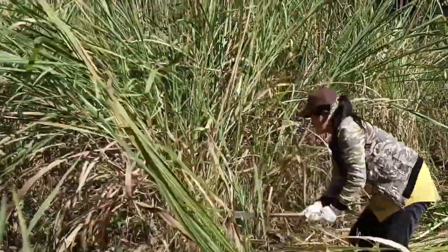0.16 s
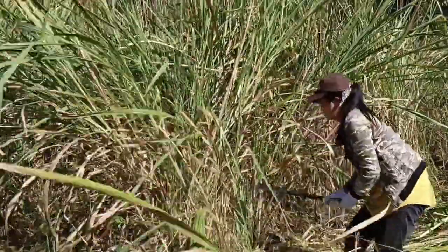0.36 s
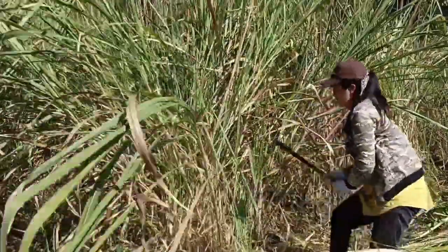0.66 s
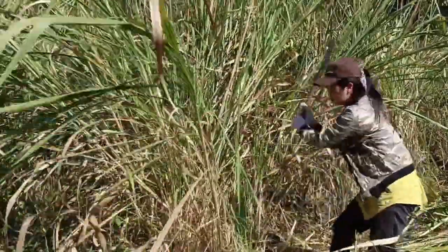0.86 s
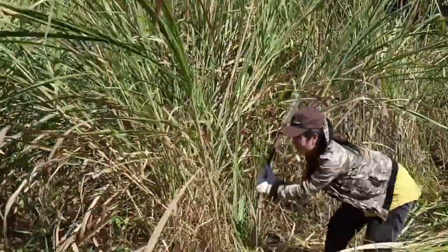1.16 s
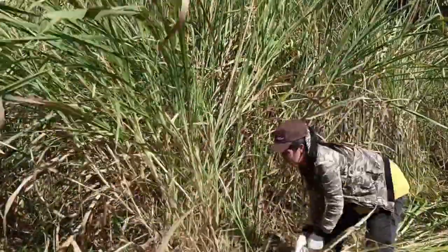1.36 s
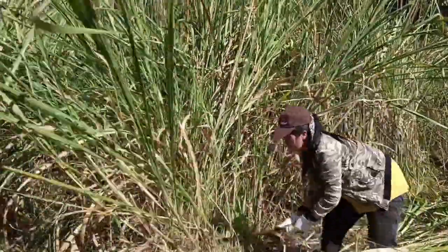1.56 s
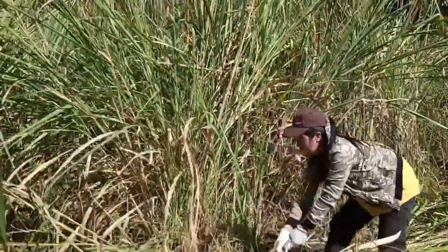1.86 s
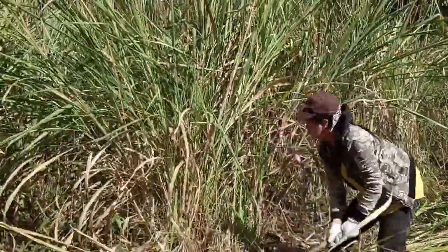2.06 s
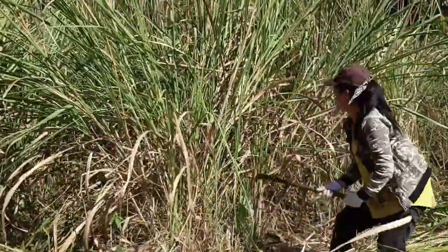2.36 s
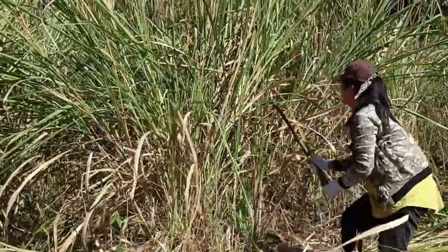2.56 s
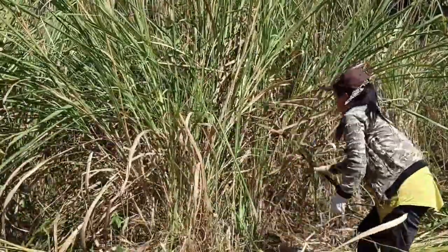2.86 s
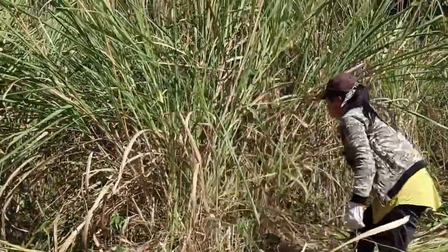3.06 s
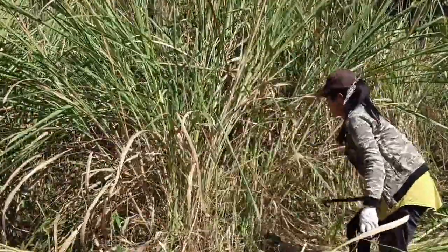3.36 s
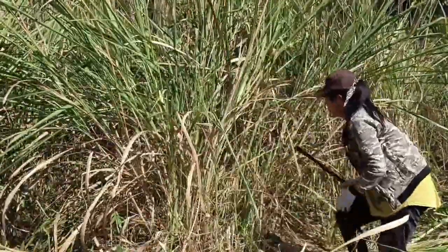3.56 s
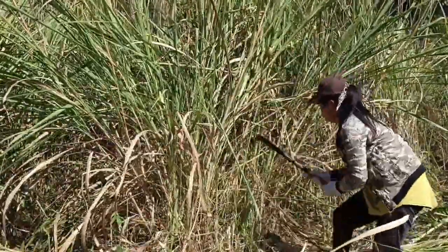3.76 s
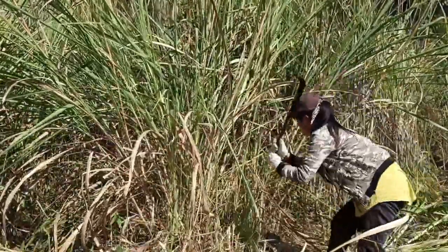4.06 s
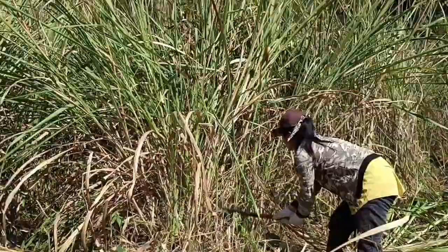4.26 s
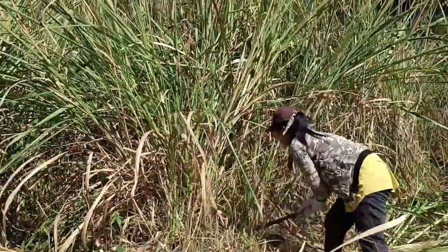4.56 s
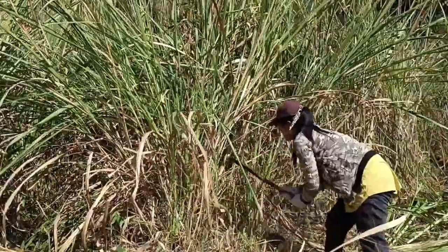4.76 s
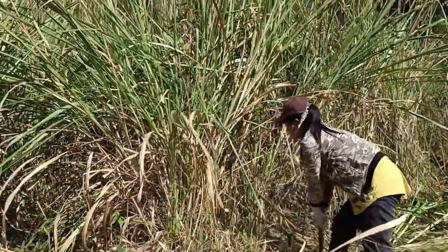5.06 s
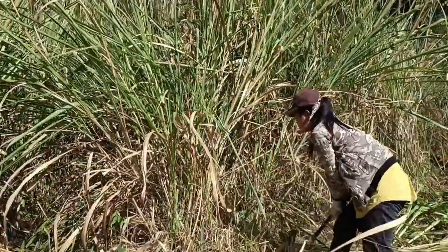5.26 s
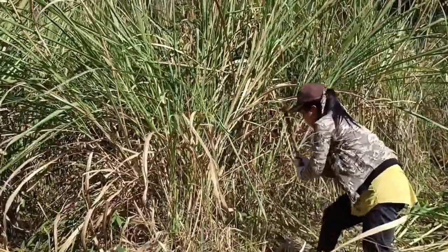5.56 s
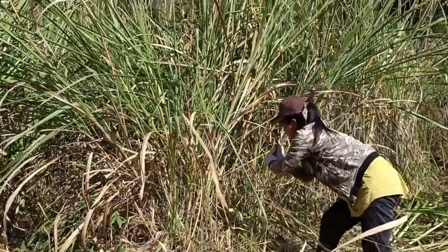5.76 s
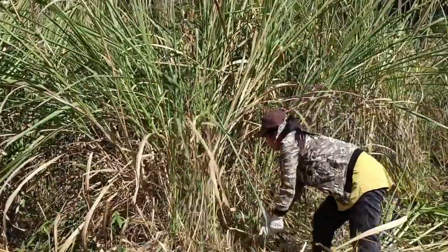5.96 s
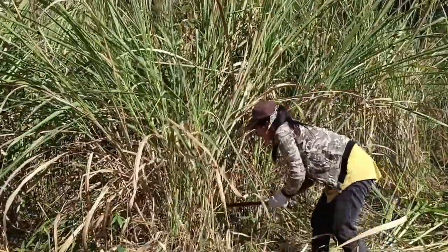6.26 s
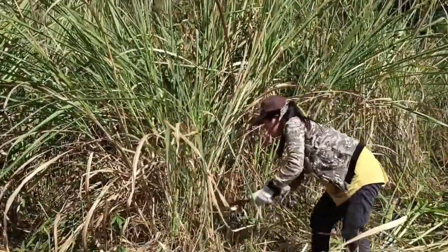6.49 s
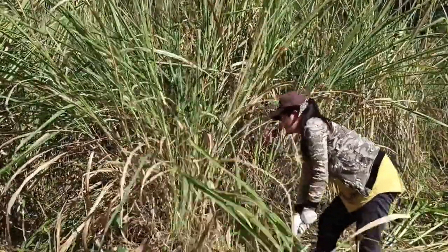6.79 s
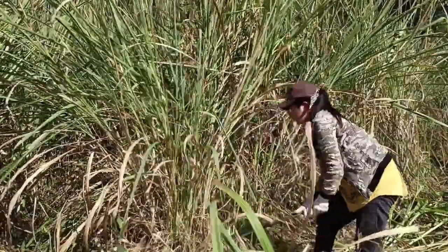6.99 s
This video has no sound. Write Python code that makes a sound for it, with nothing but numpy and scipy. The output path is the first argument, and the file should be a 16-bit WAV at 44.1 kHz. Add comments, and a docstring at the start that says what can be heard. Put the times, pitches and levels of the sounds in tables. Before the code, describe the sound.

Dry grass is already rustling loudly at the start, with two stem snaps near 0.1 s. A hard double chop with a low root thud lands around 0.55 s, then light leaf swishes and knocks until 1.0 s. Wind thumps on the left before another solid cut at 1.56 s. From 2.1 s the clump is tugged with thick crackling, easing toward 2.7 s, where a light cut and snap follow. A quick cluster of crunches comes at 3.1-3.25 s, then quieter settling with low wind on the left. A knock near 4.4 s leads to a heavy crunch at 4.57 s. Another chop and drag come at 5.3 s, and a dull knock at 5.57 s. The sharpest blow lands at 6.24 s with a deep thump, and cuts at 6.83 and 7.03 s finish amid strong rustling. Faint open air lies beneath.

```python
"""Cutting tall dry grass

A machete works through a stand of tall dry grass, a few metres from two microphone ports.
The blade crunches through bundles of stalks and thuds at their roots: bursts of tiny clicks over low noise.
Single stems snap (short noise cracks) or knock (fading tones), and dragged leaves crackle (filtered clicks).
Puffs of wind rumble unevenly in the two ports (filtered noise) with low thumps (brief sinking tones),
over faint steady air, also filtered noise."""
import sys
import numpy as np
from scipy import signal
from scipy.fft import rfft, irfft, next_fast_len
from scipy.io import wavfile

SR = 44100
rng = np.random.default_rng(int(sys.argv[2]) if len(sys.argv) > 2 else 0)


def persist_wave(psi):
    """Save psi, clipped to +-1, as 16-bit WAV."""
    counts = np.round(np.clip(psi, -1, 1) * 32767).astype(np.int16)
    wavfile.write(sys.argv[1], SR, np.atleast_2d(counts).T)


N = 314433  # samples, about 7.1 s
TIME = np.arange(N) / SR
SIZE = next_fast_len(N + 8192)  # spare room keeps filter tails from wrapping round
HZ = np.fft.rfftfreq(SIZE, 1 / SR)


# blade cuts through bundles, and a few short leaf swishes (at 0.711, 0.833 and 1.026 s):
# (time [s], length [s], crunch level [dB], root thud level [dB])
CUTS_AND_SWISHES = [(0.526, 0.003, -12, -20), (0.5557, 0.0098, -10, -21), (0.711, 0.019, -21.5, -39),
                    (0.833, 0.018, -29.5, -52), (1.026, 0.022, -23.5, -65), (1.5643, .015, -11, -20.5),
                    (2.718, 0.0083, -23.5, -51), (3.135, 0.011, -20.5, -26), (3.202, 0.01, -18, -30),
                    (3.239, 0.017, -16, -40), (4.565, 0.008, -21, -31.5), (4.583, 0.038, -13, -17),
                    (5.31, 0.013, -16, -27), (6.208, 0.051, -23.5, -43), (6.241, 0.0082, -7.5, -18.5),
                    (6.261, 0.0083, -14, -22.5), (6.834, 0.0075, -12, -23), (6.854, 0.025, -21, -27),
                    (7.027, 0.008, -18, -35)]
# a bundle is tugged and its clump shakes: (time [s], length [s], level [dB])
CLUMP_TUGS = [(2.207, 0.055, -25), (5.341, 0.031, -23)]
# thud of the rooted clump: (frequency [Hz], relative level per Hz [dB])
THUD_SPECTRUM = [(30, -44), (90, -7), (170, -4.5), (240, 0), (300, 1), (380, -22), (550, -15), (1200, -44),
                 (4000, -73)]
CUT_FADE_S, TUG_FADE_S = 0.0074, 0.031


def stroke(t, length_s, fade_s, rise_s=0.0021):
    """The force of a stroke rises quickly, holds, then dies away."""
    rise = np.clip(t / rise_s, 0, 1)
    return rise * np.exp(-np.maximum(t - length_s, 0) / fade_s)


def cuts(bright_db=1, lean_db=0.7):
    """Fibres break in a burst at each cut or leaf swish; cuts and tugs also shake the clump at its root."""
    crunch, shake = np.zeros((1, N)), np.zeros((1, N))
    t = np.arange(SR // 3)[None] / SR
    for s, length, crunch_db, thud_db in CUTS_AND_SWISHES:
        force = stroke(t, length, CUT_FADE_S)
        add(crunch, s, amp(crunch_db) * force)
        add(shake, s, amp(thud_db) * force)
    for s, length, db in CLUMP_TUGS:
        add(shake, s, amp(db) * stroke(t, length, TUG_FADE_S))
    fibres = grassy(crunch * crackle(per_s=4500, spread_db=-0.5, ring_s=0.0003))
    # thick stalks crunch with more body than leaves
    fibres = colour(fibres, read([(400, -9), (1000, 4.0), (2000, 3.0), (5000, 3), (12000, bright_db)]))
    thud = colour(shake * rng.standard_normal(N), unit(read(THUD_SPECTRUM)))
    return fibres * panned(lean_db) + thud


# thin dry stems breaking: (time [s], level before trim and colouring [dB], left-right difference [dB])
STEM_SNAPS = [(0.078, -1, 0), (0.0978, -5, 9), (0.6909, -5.5, -1), (0.9727, -11, -2), (1.2107, -18, -7),
              (2.0882, -10.5, 4.5), (2.1844, -3, 7), (2.7188, -7, 2), (2.7826, -17, 15), (3.145, -9, -6),
              (3.2157, 2, 0), (3.9773, -9.5, -1), (4.4827, -9.5, -2), (4.5716, 2.5, -1), (5.2592, -6, 0),
              (6.2195, -2.5, 0), (6.3388, -18, 6), (6.803, -14, 4), (6.836, -5, 8), (6.97, -6, -8),
              (7.0297, 2.5, 4)]


def snaps(trim_db=-3, crack_s=0.0009, splinter_s=0.025, splinter_db=-12, bright_db=2):
    """A stem breaks with one bright crack and a short splintering."""
    t, out = np.arange(SR // 16) / SR, np.zeros((2, N))
    shape = np.exp(-t / crack_s) + amp(splinter_db) * np.exp(-t / splinter_s)
    for s, db, pan in STEM_SNAPS:
        clicks = rng.choice([-1, 1], (2, len(t)))
        add(out, s, amp(db + trim_db) * panned(pan) * shape * clicks)
    return colour(grassy(out), read([(500, -9.0), (2500, -2.5), (8000, -3), (13000, bright_db)]))


# hard knocks: (time [s], level [dB], pitch [Hz], hardness as tilt over the modes [dB per octave])
STALK_KNOCKS = [(.841, -15, 2030, -8), (0.969, -18, 1340, -5), (1.266, -18.5, 1050, -2),
                (1.541, -19.5, 1050, 6), (2.783, -13.5, 2960, -1), (2.997, -21.5, 1007, -3),
                (3.143, -10, 990, 2), (3.704, -23.5, 1190, 1), (4.4111, -12.5, 1177, 6),
                (5.5718, -12, 643, -19)]
# modes of a hollow stalk: (multiple of the pitch [ratio], level [dB], time to fade by 60 dB [s])
STALK_MODES = [(1, -3.5, 0.023), (1.2, -10, 0.0098), (1.66, -0.5, 0.0095), (2.4, -4.5, 0.011),
               (2.95, -10, 0.0093)]


def knocks(tick_db=-9, tick_s=0.0055, rise_s=0.00016):
    """A hollow stalk answers a blow with a tick and a few quickly damped modes."""
    t, out = np.arange(SR // 20) / SR, np.zeros((2, N))
    for s, db, pitch, hardness in STALK_KNOCKS:
        ring = np.zeros(len(t))
        for ratio, mode_db, t60 in STALK_MODES:
            gain = amp(mode_db + hardness * np.log2(ratio) - 60 * t / t60)
            ring += gain * np.sin(2 * np.pi * (pitch * ratio * t + rng.random()))
        # a harder knock also ticks louder
        tick = amp(tick_db + hardness) * rng.standard_normal((2, len(t))) * np.exp(-t / tick_s)
        add(out, s, amp(db) * (ring + tick) * (1 - np.exp(-t / rise_s)))
    return out


# the grass is pushed, dragged or brushed: (time [s], rise [s], hold [s], level before layer gains [dB],
# fade [dB per s], thicker stems relative to leaves [dB], fine tips relative to leaves [dB])
GRASS_SWEEPS = [(0, 0.065, 0.2, -20, 38, -8, 0), (0.375, 0.05, 0.11, -20, 330, -3, 0),
                (0.556, .01, 0.094, -25, 52, -7.5, -2.5), (.9, 0.067, 0.11, -34, 53, -8.5, 0.5),
                (1.345, 0.073, 0.22, -34.5, 90, -1.5, -1.5), (1.563, 0.011, 0.0083, -20, 130, -2.5, -1.5),
                (2.133, 0.086, 0.085, -19, 48, -5.5, -.5), (2.481, 0.056, 0.12, -27, 92, -5, -.5),
                (2.862, .03, 0.11, -39.5, 80, -3, -1.5), (3.115, 0.055, .11, -23, 53, -5, 1),
                (3.496, 0.03, .04, -39, 35, -4, 3), (3.83, 0.24, .35, -34.5, 200, -3.5, 0.5),
                (4.552, 0.023, 0.061, -27.5, 232, -5.5, 1.5), (4.68, 0.03, .04, -40.5, 118, -5, 1.5),
                (5.14, 0.062, 0.022, -39, 105, -4.5, -1.5), (5.251, 0.06, 0.092, -20.5, 125, -7.5, 1),
                (5.49, 0.08, 0.094, -31.5, 97, -7.5, -1), (5.758, 0.14, 0.079, -37, 153, -6.5, -.5),
                (6.018, 0.073, 0.065, -38, 96, 0, -1), (6.215, 0.02, 0.013, -23.5, 74, -7, -1),
                (6.55, 0.031, 0.13, -34.5, 85, -5, -1.5), (6.793, 0.055, 0.24, -22, 50, -3, 1.6)]
SWAY_DB, SWAY_FADE_DB_PER_S = -18, 12.5  # fainter, slower-fading sway of the tops with each sweep
IDLE_DB, IDLE_STEMS_DB = -49, -1.5  # the grass left alone; its stems relative to its leaves


def stirring():
    """Levels of leaves, stems and tips in dB: each sweep rises, holds and dies away, adding in power."""
    t = TIME[::32]  # coarse steps, joined by straight lines below
    power = amp(IDLE_DB + np.array([[0], [IDLE_STEMS_DB], [0]])) ** 2
    for s, rise, hold, db, fade, stems_db, tips_db in GRASS_SWEEPS:
        after = np.maximum(t - s - rise - hold, 0)
        sweep = amp(db - fade * after) ** 2
        sway = amp(db + SWAY_DB - SWAY_FADE_DB_PER_S * after) ** 2
        start = np.clip((t - s) / rise, 0, 1) ** 2
        power = power + start * (sweep + sway) * amp([[0], [stems_db], [tips_db]]) ** 2
    return [np.interp(TIME, t, 10 * np.log10(p)) for p in power]


LEAN_DB, LEAN_DB_PER_S = 1.05, -0.28  # left-right place of leaves and tips, which drifts to the right


def rustle(leaves_db=2.0, stems_db=-0.35, tips_db=4.5, taps_db=-10,
           catch_db=0.94, stem_catch_db=1.63, tip_catch_db=0.4, hard_db=-27, blend_db=4):
    """Hard dragging gives fast, short, uneven crackle; settling grass slower, longer-ringing, with taps."""
    level, stem_level, tip_level = stirring()
    body, fine = stem_level - level, tip_level - level
    # share of dragging: near 0 in quiet grass, half at hard_db, near 1 in hard sweeps
    hard = 1 / (1 + np.exp((hard_db - level) / blend_db))
    dragged = crackle(per_s=7000, spread_db=2.5, ring_s=0.0012)
    settling = crackle(per_s=4000, spread_db=1.5, ring_s=0.0022)
    grains = grassy(np.sqrt(hard) * dragged + np.sqrt(1 - hard) * settling)
    grains = shifting(grains, depth_db=2.5, span_hz=151, span_s=0.071)
    # thick stems sound low, leaves in the middle, fine tips high
    low, middle = below(grains, hz=1850), below(grains, hz=5270)
    stems = amp(stems_db + body + stem_catch_db * flutter(per_s=18)) * evened(low)
    leaves = amp(leaves_db) * evened(middle - low)
    tips = amp(tips_db + fine + tip_catch_db * flutter(per_s=15)) * evened(grains - middle)
    tapping = taps(per_s=120, spread_db=5, ring_s=0.0072, low_hz=932, high_hz=3910)
    tapping = amp(taps_db + body / 2) * np.sqrt(1 - hard) * tapping
    place = panned(LEAN_DB + LEAN_DB_PER_S * TIME)
    grass = place * (leaves + tips) + stems + tapping
    return amp(level + catch_db * flutter(per_s=13.4)) * grass


def taps(per_s, spread_db, ring_s, low_hz, high_hz, rise_s=0.00087):
    """Hollow stems tap one another, each with its own short pitched ring."""
    t, out = np.arange(SR // 30) / SR, np.zeros((2, N))
    for when, force, stem, left, right in rng.random((round(per_s * N / SR), 5)):
        hz = low_hz * (high_hz / low_hz) ** stem
        tone = np.sin(2 * np.pi * (hz * t + np.array([[left], [right]])))
        ring = tone * np.exp(-t / ring_s) * (1 - np.exp(-t / rise_s))
        add(out, when * N / SR, amp(spread_db * force ** 2) * ring)
    return evened(spaced(out))


def crackle(per_s, spread_db, ring_s):
    """Dry fibres break at random moments with uneven force, each in a tiny fading burst."""
    force = amp(spread_db * np.minimum(rng.exponential(1, N), 5))
    size = force * (rng.random(N) < per_s / SR)
    # overlapping bursts add in power
    power = signal.lfilter([1], [1, -np.exp(-2 / (ring_s * SR))], size ** 2)
    return evened(np.sqrt(power) * rng.standard_normal((2, N)))


def flutter(per_s):
    """A smooth random wander of rms 1, for levels that waver."""
    count = N // 2 + 1
    draws = rng.standard_normal(count) * np.exp(2j * np.pi * rng.random(count))
    slow = 1 + (np.fft.rfftfreq(N, 1 / SR) / per_s) ** 2
    return evened(irfft(draws / slow, N))


def shifting(x, depth_db, span_hz, span_s):
    """Each moment other leaves carry the sound, so its colour wanders in patches."""
    z = signal.stft(x, nperseg=1024, noverlap=768)[2]
    patches = rng.standard_normal(z.shape[1:])
    # smooth the random patches across frequency and along time
    across = np.fft.fftfreq(z.shape[1], SR / 1024)[:, None]
    along = np.fft.fftfreq(z.shape[2], 256 / SR)
    smooth = np.exp(-(across * span_hz) ** 2 - (along * span_s) ** 2)
    patches = evened(np.fft.ifft2(np.fft.fft2(patches) * smooth).real)
    return signal.istft(z * amp(depth_db * patches), nperseg=1024, noverlap=768)[1][:, :N]


# crackle of dry leaves: (frequency [Hz], relative level per Hz [dB])
LEAF_SPECTRUM = [(30, -14), (90, -11.5), (160, -3), (600, -0.5), (1500, 1), (5500, 2), (7500, -3.5),
                 (10500, -4), (13000, 0.5), (15500, -2)]
# humps and hollows in the sound of the clump: (centre [Hz], half width [Hz], level [dB])
CLUMP_HUMPS = [(258, 110, 4), (403, 76, -8), (713, 43, 2), (1057, 76, -4), (1312, 52, 2.5), (2047, 180, 5),
               (2300, 270, -3), (2740, 440, 6), (3380, 450, 6.5)]


def grassy(x):
    """Dry leaves and the clump favour some pitches: gives white clicks their colour."""
    return colour(spaced(x), unit(read(LEAF_SPECTRUM) + humps(CLUMP_HUMPS)))


def thicket(x, wet_db, t60=0.15):
    """The standing stalks scatter each blow into a short diffuse tail."""
    t = np.arange(SR // 4) / SR
    tail = rng.standard_normal((2, len(t))) * amp(-60 * t / t60) * (t > .003)
    tail = tail / np.linalg.norm(tail[0])
    scattered = signal.fftconvolve(x, tail, axes=1)[:, :N]
    return x + amp(wet_db) * spaced(scattered)


# low thumps: wind eddies at a port, and at 6.286 s a centred thump of the blade's blow or the air it pushes:
# (time of peak [s], level [dB], pitch at the peak [Hz], left-right difference [dB])
LOW_THUMPS = [(0.944, -32.5, 76, -31), (1.122, -18.5, 85, -23.5), (1.335, -28.5, 80, -21),
              (1.554, -17, 72, -25), (3.322, -23, 91, -13), (3.481, -24.5, 70, -27),
              (3.611, -20, 75, -21.5), (3.716, -23, 61, -7.5), (3.765, -23, 61.3, -9), (4.255, -31, 51, 33),
              (4.377, -31.5, 65, 27), (6.286, -16, 71.5, 1)]
THUMP_CYCLES, THUMP_SAG_PER_S = 0.8, 32  # half length in its own cycles; how fast its pitch sinks


def thumps():
    """Moving air gives a brief low swing of pressure that slows as it passes."""
    t, out = np.arange(-SR // 20, SR // 20) / SR, np.zeros((2, N))
    for s, db, hz, pan in LOW_THUMPS:
        cycles = hz * (1 - np.exp(-THUMP_SAG_PER_S * t)) / THUMP_SAG_PER_S
        swing = np.cos(2 * np.pi * cycles) * np.exp(-(cycles / THUMP_CYCLES) ** 2)
        add(out, s + t[0], amp(db) * panned(pan) * swing)
    return out


# spells of wind at the ports: (time [s], length [s], level [dB], left-right difference [dB])
WIND_GUSTS = [(0.255, 0.15, -47, -13), (1.214, 0.09, -42, -21), (1.357, 0.23, -32, -8),
              (2.038, 0.14, -41.5, -24.5), (2.197, 0.31, -39.5, -18), (2.523, 0.37, -36.5, -11),
              (3.047, 0.31, -43, -7), (3.268, 0.59, -38, -13), (4.171, 0.26, -42.5, 27.5),
              (6.49, 0.093, -45, -16), (6.885, .28, -35.5, 6)]
# wind in a port: (frequency [Hz], relative level per Hz [dB])
WIND_SPECTRUM = [(12, -34.5), (30, -2), (50, 6), (75, 4.5), (110, -4), (170, -16), (300, -34), (1000, -66)]


def wind(lump_db=3):
    """Turbulence rumbles in each port on its own, in lumpy spells."""
    strength = np.zeros((2, N))
    for s, length, db, pan in WIND_GUSTS:
        swell = signal.windows.tukey(max(round(length * SR), 2), .35)
        add(strength, s, amp(db) * panned(pan) * swell)
    eddies = evened(colour(rng.standard_normal((2, N)), read(WIND_SPECTRUM)))
    return strength * eddies * amp(lump_db * flutter(per_s=15))


# the open field: (frequency [Hz], relative level per Hz [dB])
FIELD_SPECTRUM = [(20, 2), (60, 2), (130, -19), (250, -16), (400, -8), (1000, -12.5), (3000, -25),
                  (15000, -51)]


def field(level_db=-55):
    """Faint steady air over the open field, made of filtered noise."""
    noise = spaced(rng.standard_normal((2, N)))
    return amp(level_db) * evened(colour(noise, read(FIELD_SPECTRUM)))


# likeness of the two ports: (frequency [Hz], correlation [0 to 1])
PORT_LIKENESS = [(30, 0.3), (300, 0.91), (750, 0.79), (1200, 0.48), (2000, 0.23), (3000, 0.051),
                 (4300, 0.0054), (15000, 0.018)]


def spaced(x):
    """Two spaced ports hear long waves alike and short waves differently."""
    angle = np.arcsin(np.clip(read(PORT_LIKENESS), 0, 1)) / 2
    z = rfft(x, SIZE)
    # each side takes in some of the other
    return irfft(np.cos(angle) * z + np.sin(angle) * z[::-1], SIZE)[:, :N]


def amp(db):
    """Decibels to gain."""
    return 10 ** (np.asarray(db) / 20)


def evened(x):
    """Scales to rms 1."""
    return x / np.sqrt(np.mean(x ** 2) + 1e-20)


def read(points):
    """A spectrum table joined by straight lines on a log-frequency axis."""
    hz, value = np.transpose(points)
    return np.interp(np.log(HZ + 1), np.log(hz + 1), value)


def humps(rows):
    """Bell-shaped peaks and dips, in dB."""
    return sum(db * np.exp(-((HZ - hz) / width) ** 2) for hz, width, db in rows)


def colour(x, db):
    """Causal (minimum-phase) filter with the given gain, so that clicks keep their sharp front."""
    cepstrum = irfft(np.log(amp(np.maximum(db, -100))), SIZE)
    # folding the second half onto the first puts the response after the click
    cepstrum[1:SIZE // 2] *= 2
    cepstrum[SIZE // 2 + 1:] = 0
    return irfft(rfft(x, SIZE) * np.exp(rfft(cepstrum)), SIZE)[..., :N]


def unit(db):
    """Shifts a gain curve so that white noise keeps its power."""
    return db - 10 * np.log10(np.mean(amp(db) ** 2))


def below(x, hz):
    """The part of a sound under a frequency."""
    return irfft(rfft(x, SIZE) / (1 + (HZ / hz) ** 8), SIZE)[:, :N]


def panned(db):
    """Left and right gains for a level difference."""
    return amp(np.array([np.atleast_1d(db), -np.atleast_1d(db)]) / 2)


def add(mix, s, sound):
    """Lays a sound into the mix at a time in seconds."""
    part = mix[:, max(round(s * SR), 0):][:, :sound.shape[1]]
    part += sound[:, :part.shape[1]]


def scene():
    """Blows and swishes in the thicket, moving grass, low thumps, wind and air."""
    blows = cuts() + snaps() + knocks()
    return thicket(blows, wet_db=-11.0) + rustle() + thumps() + wind() + field()


# notches of the port cavities: (centre [Hz], half width [Hz], level [dB])
CAVITY_NOTCHES = [(8990, 260, -13.5), (11370, 510, -9.5)]
# the right port is the brighter one: (frequency [Hz], left-right difference [dB])
BRIGHTNESS_BALANCE = [(100, -1), (8000, -1.5), (11000, -3), (12800, -6.5), (15500, -7.5)]
EDGE_HZ = 15520  # top of the band


def record(dry):
    """Port colour, soft overload near full scale, and the band limit."""
    notches, balance = humps(CAVITY_NOTCHES), read(BRIGHTNESS_BALANCE) / 2
    ports = np.array([colour(x, notches + side * balance) for x, side in zip(dry, (1, -1))])
    held = ports / (1 + ports ** 6) ** (1 / 6)
    band = signal.firwin(601, EDGE_HZ, window=("kaiser", 8), fs=SR)
    return signal.oaconvolve(held, band[None], "same", axes=1)


dry = scene()
out = record(dry)
persist_wave(out)
```